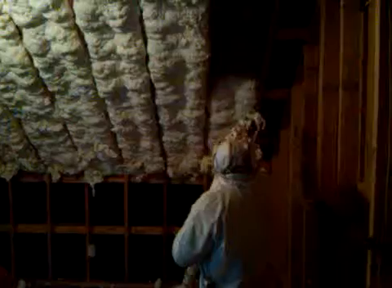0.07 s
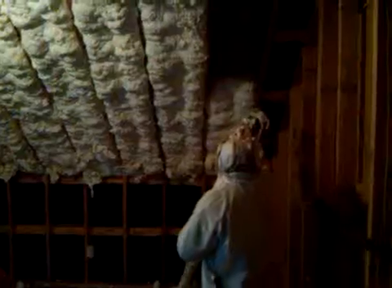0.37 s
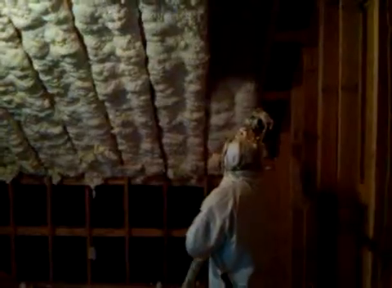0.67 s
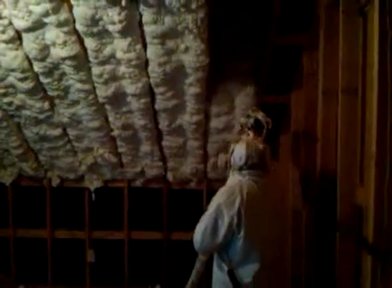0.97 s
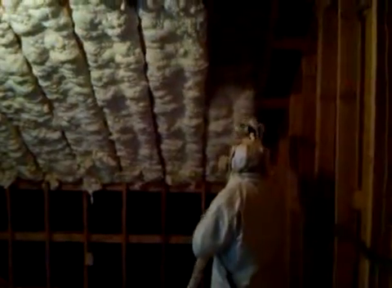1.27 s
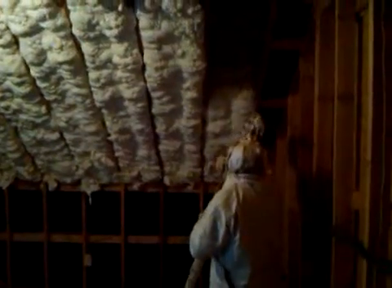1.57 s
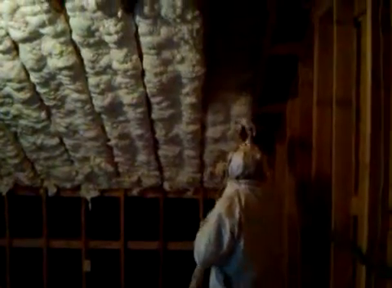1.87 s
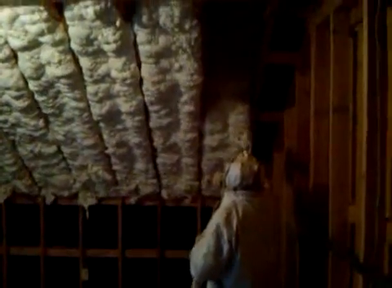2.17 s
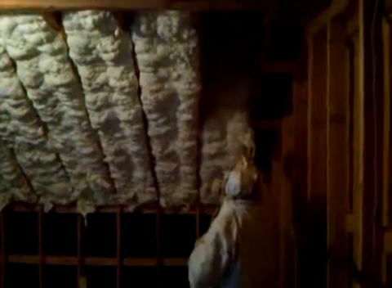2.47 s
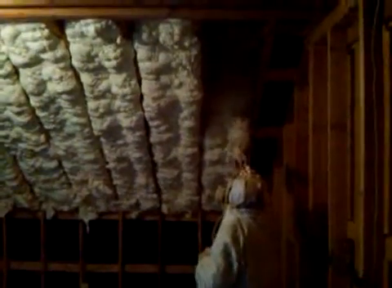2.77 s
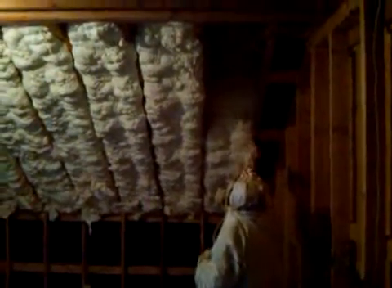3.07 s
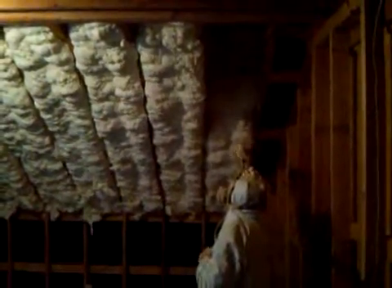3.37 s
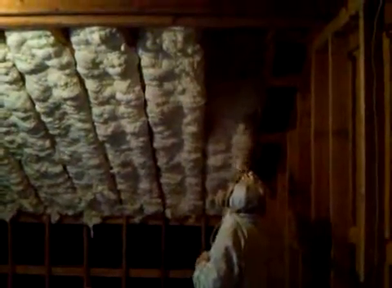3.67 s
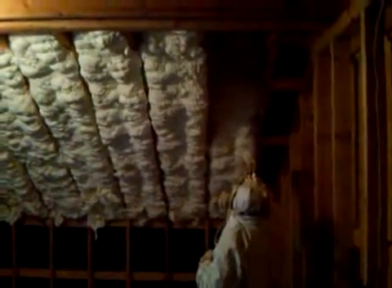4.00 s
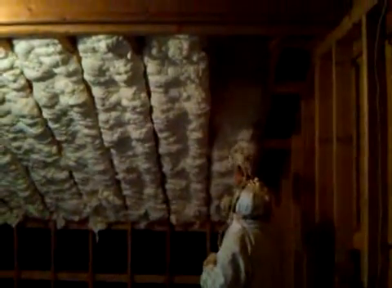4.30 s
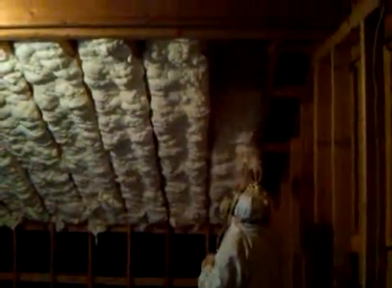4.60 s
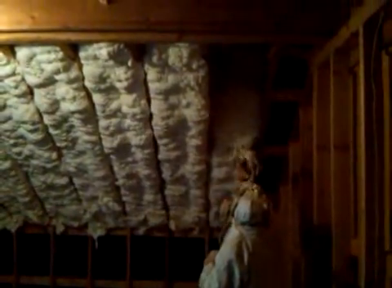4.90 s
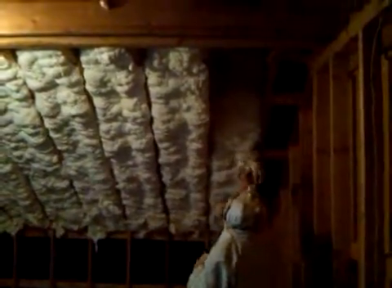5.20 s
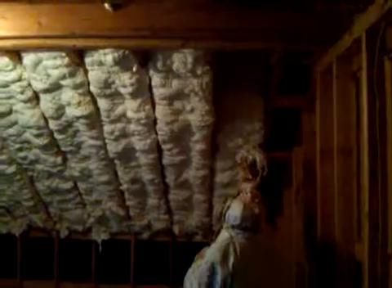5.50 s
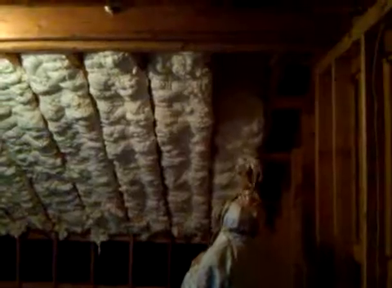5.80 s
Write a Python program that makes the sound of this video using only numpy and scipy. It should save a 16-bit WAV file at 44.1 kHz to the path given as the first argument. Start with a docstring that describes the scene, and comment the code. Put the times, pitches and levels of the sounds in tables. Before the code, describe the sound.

A spray gun hisses and sizzles unevenly as insulation foam patters onto attic boards, over a low machine hum.

```python
"""Insulation foam sprayed between attic rafters, a few metres away; pump rig and blower hum throughout.
First the nozzle hisses with a thin fan of droplets. At 0.8 s the trigger opens fully: pressure surges,
the fan spreads and sizzles, a low rush builds. The gun sweeps, droplets drum into the hollow bay,
pockets ring and three faint pips tick. From 2.5 s the flow chokes now and then;
from 3.7 s the spray drums louder on bare boards."""
import sys
import numpy as np
from scipy import signal
from scipy.fft import rfft, irfft, next_fast_len
from scipy.io import wavfile

SR = 44100
rng = np.random.default_rng(int(sys.argv[2]) if len(sys.argv) > 2 else 0)


def master(y):
    """Save y as 16-bit WAV."""
    cut = np.clip(np.atleast_2d(y).T, -1, 1)
    pcm = np.round(cut * 32767)  # scale
    wavfile.write(sys.argv[1], SR, pcm.astype(np.int16))


N = 257984
TIME_S = np.arange(N) / SR

# noise spectra: freq_hz, relative_density_db
BLOWER_SPECTRUM = [(20, -9.5), (36, -12), (52, -10.5), (75, -17.5), (95, -15), (115, -0.5), (136, -6.5),
                   (200, -1.5), (250, -4.5), (305, 0.4), (365, -4.5), (410, 1), (510, -1.5), (565, -4),
                   (615, -0.5), (690, -5.5), (1100, -6.5), (2200, -9), (7000, -11)]
BAY_AIR_SPECTRUM = [(230, -5.5), (330, -1), (480, -0.5), (600, -3), (800, -12), (2000, -34.5)]
BOARD_SPECTRUM = [(120, -25), (300, -16), (550, -5), (720, -6), (790, -1), (860, -2.5), (1030, 0),
                  (1250, -3), (1480, 0.5), (2050, -5), (2400, -5.5), (3500, -9.5), (7000, -17)]
DROPLET_FAN_SPECTRUM = [(500, -24.5), (1500, -20), (2050, -14.5), (2400, -5), (2680, 0.5), (2950, -2),
                        (3250, -1), (3700, -1), (4500, -5), (7300, -13.5)]
NOZZLE_SPECTRUM = [(2000, -53.5), (3000, -20.5), (3350, -24), (3680, -11), (3980, -13.5), (4150, -2.5),
                   (4900, 0.5), (5700, 0.5), (6500, 2.5), (7000, 0.5), (7300, -7)]
# rig hums: pitch_hz, rms_db, unsteady_share
RIG_HUMS = [(111.8, -78, .88), (116.4, -78.5, 0.96), (201, -78.5, 1), (450, -73.2, 0.82),
            (503.7, -75.5, 0.98), (789, -79, 1)]
# pump working against the hose: centre_s, swell_db, length_s
PUMP_LOADS = [(0.08, 10, 0.055), (0.54, 6.5, 0.14), (0.915, 14.5, 0.12), (1.08, 10, 0.14), (1.29, 6, 0.08),
              (1.58, 0, 0.072), (1.88, 12.5, 0.2), (2.18, 9.5, 0.22), (2.42, 10.5, 0.18), (2.62, 8.5, 0.18),
              (2.88, 10.5, 0.19), (3.4, 7, 0.1), (3.7, 7, 0.08), (4.0, 11, 0.16), (4.37, 14, 0.35),
              (4.6, 9.5, 0.1), (4.84, 9.5, 0.22), (5.24, 14.5, 0.083), (5.74, 10, 0.22)]
# landing spray, louder towards bare boards: time_s, relative_db
LANDING_CURVE = [(0.06, -71.5), (0.75, -68.5), (0.86, -61.5), (1.6, -62.5), (1.95, -67), (2.85, -68),
                 (3.65, -67.5), (3.73, -58), (4.6, -57), (5.15, -58.5), (5.55, -58.5), (5.85, -58.5)]
# arm strokes across the boards: centre_s, swell_db, length_s
ARM_STROKES = [(1.71, 5, 0.13), (2.41, 9, 0.22), (3.19, 9.5, 0.28), (3.88, 2, 0.12), (4.87, 2, 0.17),
               (5.463, 1.5, 0.19)]
# hollows rung by the jet: centre_s, pitch_hz, relative_db, length_s, bandwidth_share
RINGING_POCKETS = [(0.842, 3660, -56, 0.049, 0.12), (0.892, 595, -67, 0.071, 0.38),
                   (1.266, 2220, -64.5, 0.11, 0.42), (1.52, 3420, -55, 0.11, 0.19),
                   (1.554, 2370, -60, 0.071, 0.23), (1.706, 1120, -62, 0.063, 0.47),
                   (1.723, 3150, -56, 0.05, 0.11), (2.082, 2670, -54.5, 0.044, 0.28),
                   (2.361, 2670, -55, 0.089, 0.3), (2.422, 1110, -64, 0.09, 0.2),
                   (2.425, 1640, -60, 0.14, 0.29), (3.065, 3370, -56.5, 0.11, 0.41),
                   (3.148, 1010, -65, 0.19, 0.34), (3.278, 1830, -62, 0.08, 0.2),
                   (3.282, 3430, -58, 0.088, 0.25), (3.474, 3400, -63, 0.07, .24),
                   (3.752, 980, -66, 0.082, 0.42), (3.887, 930, -59.5, 0.058, 0.37),
                   (3.996, 1400, -64, 0.05, 0.4), (4.153, 1180, -59, 0.093, 0.32),
                   (4.212, 3200, -56.5, 0.23, 0.31), (4.322, 1520, -60, 0.066, 0.11),
                   (4.379, 1760, -62.5, 0.17, 0.23), (4.4, 2430, -57, 0.06, 0.2),
                   (4.508, 1090, -66, 0.083, 0.24), (4.658, 2390, -63, 0.15, 0.16),
                   (4.768, 990, -61.5, 0.11, 0.46), (4.842, 1452, -58, 0.075, 0.06),
                   (4.89, 1010, -56, 0.034, 0.49), (5.003, 2870, -63, 0.06, 0.067),
                   (5.058, 1460, -61, 0.092, .06), (5.226, 2310, -64.5, 0.17, .15),
                   (5.292, 834, -63, 0.053, 0.33), (5.4, 2350, -57, 0.05, .14),
                   (5.461, 1024, -58.5, 0.11, 0.24), (5.472, 1400, -59, 0.036, 0.16),
                   (5.77, 2980, -64, 0.048, 0.36)]
# pips above the hiss: centre_s, peak_db
HIGH_PIPS = [(0.831, -46), (1.662, -47), (2.367, -48.5)]
# nozzle hiss, louder when aimed at the listener: time_s, relative_db
HISS_CURVE = [(0.06, -52), (0.11, -47), (0.26, -47.5), (0.38, -45.3), (0.54, -47), (0.8, -44), (0.87, -42),
              (0.97, -41.5), (1.08, -41), (1.24, -39), (1.29, -42), (1.43, -38.7), (1.53, -39.8),
              (1.6, -36), (1.69, -39.2), (1.79, -39), (1.87, -42.5), (1.95, -43.5), (2.25, -46),
              (2.46, -45.5), (2.56, -47.5), (2.7, -49.5), (2.79, -51.3), (2.89, -51), (2.98, -48),
              (3.09, -45.5), (3.17, -47), (3.29, -46.7), (3.42, -49), (3.65, -48), (3.77, -45.5),
              (4.02, -46), (4.26, -45), (4.46, -46.5), (4.63, -46), (4.75, -47.5), (4.88, -44),
              (5.03, -47.5), (5.17, -48), (5.36, -46.5), (5.6, -49), (5.85, -52.5)]
# flow chokes: start_s, depth_db, length_s
FLOW_CHOKES = [(0.46, -0.5, 0.06), (0.894, -3, 0.024), (1.125, -0.5, 0.04), (2.561, -4, 0.11),
               (2.684, -4, 0.34), (3.358, -2.5, 0.11), (3.606, -4, 0.066), (3.877, -7, 0.37),
               (5.03, -3, 0.16), (5.194, -3, 0.11)]

BLOWER_DB, PUMP_IDLE_DB, PUMP_HZ = -59.4, -76, 213.5
PULL_S, SQUEEZE_S, SURGE_DECAY_S = 0.809, 0.55, 0.06
SURGE_HISS_DB, SURGE_LANDING_DB, SURGE_FAN_EXTRA_DB = 10.5, 3.5, 5.5
USUAL_HISS_DB, USUAL_LANDING_DB, USUAL_FAN_DB = -47, -58, -54.5
FAN_PER_HISS, FAN_PER_LANDING = 0.52, 0.41  # dB per dB
NARROW_FAN_DB, NARROW_SHARE_AT_PULL = -9, 0.22
SPRAY_TOP_HZ, CUTOFF_HZ = 7250, 8300


def from_db(db):
    """Decibels to gain."""
    return 10 ** (np.asarray(db) / 20)


def rms_one(x):
    """Scale to unit rms."""
    return x / np.sqrt(np.mean(x ** 2) + 1e-20)


def curve_db(rows):
    """Level curve at every sample."""
    return np.interp(TIME_S, *np.transpose(rows))


def bell(centre_s, length_s):
    """Gaussian, peak 1, length_s wide at half height."""
    return np.exp2(-np.minimum((2 * (TIME_S - centre_s) / length_s) ** 2, 60))


def swells_db(rows):
    """Sum of bell-shaped level swells."""
    return sum(swell_db * bell(centre_s, length_s) for centre_s, swell_db, length_s in rows)


def drift(rate_hz):
    """Smooth random wander, about rate_hz turns a second; rms 1."""
    step, settle = 40, 2000
    pole = np.exp(-2 * np.pi * rate_hz * step / SR)
    noise = rng.standard_normal(N // step + settle + 2)
    slow = signal.lfilter([1], [1, -2 * pole, pole * pole], noise)[settle:]
    return np.interp(np.arange(N) / step, np.arange(len(slow)), rms_one(slow))


def coloured(x, spectrum):
    """Shape x by a spectrum table; rms 1."""
    points_hz, level_db = np.transpose(spectrum)
    size = next_fast_len(N)
    freq_hz = np.maximum(np.arange(size // 2 + 1) * SR / size, 1)
    gain = from_db(np.interp(np.log(freq_hz), np.log(points_hz), level_db))
    low_cut = np.minimum(freq_hz / points_hz[0], 1) ** 2
    return rms_one(irfft(rfft(x, size) * gain * low_cut, size)[:N])


def resonance(x, pitch_hz, width_hz):
    """Two-pole resonance, peak gain 1."""
    r = np.exp(-np.pi * width_hz / SR)
    feedback = [1, -2 * r * np.cos(2 * np.pi * pitch_hz / SR), r * r]
    return signal.lfilter([(1 - r * r) / 2, 0, (r * r - 1) / 2], feedback, x)


def low_pass(x, cutoff_hz):
    """Steep elliptic cut."""
    return signal.sosfilt(signal.ellip(12, .2, 80, cutoff_hz, fs=SR, output="sos"), x)


def hum(pitch_hz, unsteady_share, waver_hz):
    """Machine tone, wavering in strength and phase; rms 1."""
    wander = (drift(waver_hz) + 1j * drift(waver_hz)) / np.sqrt(2)
    phasor = np.sqrt(1 - unsteady_share ** 2) + unsteady_share * wander
    return rms_one(np.real(phasor * np.exp(2j * np.pi * (pitch_hz * TIME_S + rng.random()))))


def rig():
    """Blower rushes and hums; pump drone swells with load."""
    pump_db = PUMP_IDLE_DB + swells_db(PUMP_LOADS)
    pump = from_db(pump_db) * hum(PUMP_HZ, unsteady_share=0.3, waver_hz=6)
    hums = sum(from_db(db) * hum(hz, share, waver_hz=8.6) for hz, db, share in RIG_HUMS)
    blower = from_db(BLOWER_DB) * coloured(rng.standard_normal(N), BLOWER_SPECTRUM)
    return pump + hums + blower


def air_rush(level_db, build_s):
    """The fully open jet stirs the bay's air into a low rush."""
    envelope = 1 - np.exp(-np.maximum(TIME_S - PULL_S, 0) / build_s)
    return from_db(level_db) * envelope * coloured(rng.standard_normal(N), BAY_AIR_SPECTRUM)


def attic(x, t60_s, wet_db, patterns=6):
    """Short tail, damped by fresh foam; echo patterns crossfade as the gun moves."""
    delay_s = np.arange(SR // 4) / SR
    wet = np.zeros(N)
    for _ in range(patterns):
        tail = rng.standard_normal(len(delay_s)) * from_db(-60 * delay_s / t60_s) * (delay_s > .004)
        tail /= np.sqrt(np.sum(tail ** 2) * patterns)
        wet += signal.oaconvolve(x * drift(rate_hz=2.4), tail)[:N]
    return x + from_db(wet_db) * wet


def pips(pitch_hz, length_s):
    """High pips, short enough to be heard as faint ticks."""
    envelope = sum(from_db(peak_db) * bell(centre_s, length_s) for centre_s, peak_db in HIGH_PIPS)
    return envelope * np.sin(2 * np.pi * pitch_hz * TIME_S)


def droplets(per_s, spread_db):
    """Random impulses, many small, few large; rms 1."""
    sizes = from_db(spread_db * np.minimum(rng.exponential(1, N), 4)) * rng.choice([-1, 1], N)
    return rms_one(sizes * (rng.random(N) < per_s / SR))


def swish(x, depth_db, rate_hz):
    """Foam builds up and the arm moves: each third-octave wanders in level; rms 1."""
    size = next_fast_len(N)
    spectrum = rfft(x, size)
    freq_hz = np.arange(len(spectrum)) * SR / size
    thirds = 3 * np.log2(np.clip(freq_hz, 500, 8000) / 500)
    bands = (irfft(spectrum * np.maximum(1 - abs(thirds - k), 0), size)[:N] for k in range(13))
    return rms_one(sum(band * from_db(depth_db * drift(rate_hz)) for band in bands))


def pockets(gain_db, rise_octaves_per_s):
    """Each hollow rings as the jet crosses it, rising in pitch as it fills with foam."""
    out = np.zeros(N)
    jet = droplets(per_s=12000, spread_db=1.5)
    for centre_s, pitch_hz, relative_db, length_s, bandwidth_share in RINGING_POCKETS:
        near = abs(TIME_S - centre_s) < 2 * length_s
        offset_s = TIME_S[near] - centre_s
        width_hz = bandwidth_share * pitch_hz
        ring = rms_one(resonance(resonance(jet[near], pitch_hz, width_hz), pitch_hz, width_hz))
        warped_s = offset_s + np.log(2) * rise_octaves_per_s * offset_s ** 2 / 2
        envelope = from_db(relative_db + gain_db) * np.exp2(-2 * (offset_s / length_s) ** 2)
        out[near] += envelope * np.interp(warped_s, offset_s, ring)
    return out


def landing_spray(envelope_db, gain_db, clump_db):
    """Droplets drum on the roof boards in uneven clumps."""
    patter = coloured(droplets(per_s=11000, spread_db=3.0), BOARD_SPECTRUM)
    patter = swish(patter, depth_db=1.13, rate_hz=3.1)
    return patter * from_db(envelope_db + gain_db + clump_db * drift(rate_hz=9.3))


def pressure_surge():
    """Stored hose pressure escapes at the trigger pull; decays from 1."""
    return (TIME_S >= PULL_S) * np.exp(-np.maximum(TIME_S - PULL_S, 0) / SURGE_DECAY_S)


def chokes_db(hold_exponent):
    """Flow drops abruptly, stays low, recovers."""
    dip_db = np.zeros(N)
    for start_s, depth_db, length_s in FLOW_CHOKES:
        recovery = np.clip((TIME_S - start_s) / length_s, 0, 1) ** hold_exponent
        dip_db += depth_db * (TIME_S >= start_s) * (1 - recovery)
    return dip_db


def spray_envelopes_db():
    """Trigger and arm drive hiss and landing; the fan follows both and widens with the squeeze."""
    surge = pressure_surge()
    hiss_db = curve_db(HISS_CURVE) + SURGE_HISS_DB * surge + chokes_db(hold_exponent=1.7)
    landing_db = curve_db(LANDING_CURVE) + SURGE_LANDING_DB * surge + swells_db(ARM_STROKES)
    narrowness = (TIME_S < PULL_S) * np.clip((PULL_S - TIME_S) / SQUEEZE_S, NARROW_SHARE_AT_PULL, 1)
    fan_db = USUAL_FAN_DB + FAN_PER_HISS * (hiss_db - USUAL_HISS_DB)
    fan_db += FAN_PER_LANDING * (landing_db - USUAL_LANDING_DB)
    fan_db += NARROW_FAN_DB * narrowness + SURGE_FAN_EXTRA_DB * surge
    return hiss_db, fan_db, landing_db


def spray_gun(hiss_db, fan_db, hiss_gain_db, sputter_db, flutter_db):
    """The jet hisses and tears into droplets; both sputter with the uneven flow."""
    flow_db = sputter_db * drift(rate_hz=12) + flutter_db * drift(rate_hz=62)
    hiss = coloured(rng.standard_normal(N), NOZZLE_SPECTRUM)
    hiss = swish(hiss, depth_db=0.02, rate_hz=28)
    fan = coloured(droplets(per_s=16000, spread_db=2.5), DROPLET_FAN_SPECTRUM)
    fan = swish(fan, depth_db=1.8, rate_hz=25)
    return (from_db(hiss_db + hiss_gain_db) * hiss + from_db(fan_db) * fan) * from_db(flow_db)


def scene():
    """Gun and landing spray in the attic, over rig and air rush; pips on top. Mono."""
    hiss_db, fan_db, landing_db = spray_envelopes_db()
    gun = spray_gun(hiss_db, fan_db, hiss_gain_db=1.0, sputter_db=0.39, flutter_db=0.3)
    boards = landing_spray(landing_db, gain_db=1.06, clump_db=1.0)
    hollows = pockets(gain_db=0.95, rise_octaves_per_s=0.25)
    spray = attic(gun + boards + hollows, t60_s=0.24, wet_db=-9)
    background = rig() + air_rush(level_db=-68, build_s=0.04)
    mix = low_pass(background + spray, SPRAY_TOP_HZ) + pips(pitch_hz=8004, length_s=0.0051)
    return mix[None]


def record(dry):
    """Quick fade-in, steep treble cut."""
    fade_in = np.clip((TIME_S - .038) / .022, 0, 1)
    return low_pass(dry * fade_in, CUTOFF_HZ)


dry = scene()
out = record(dry)
master(out)
```